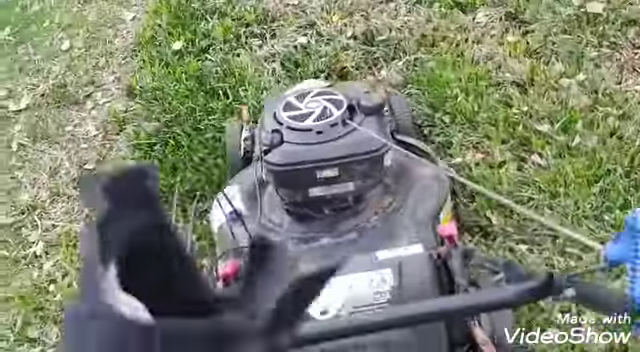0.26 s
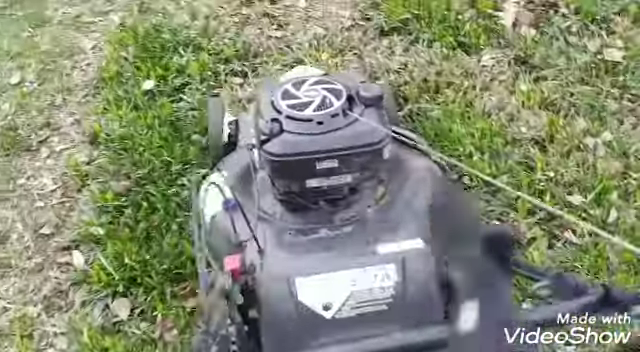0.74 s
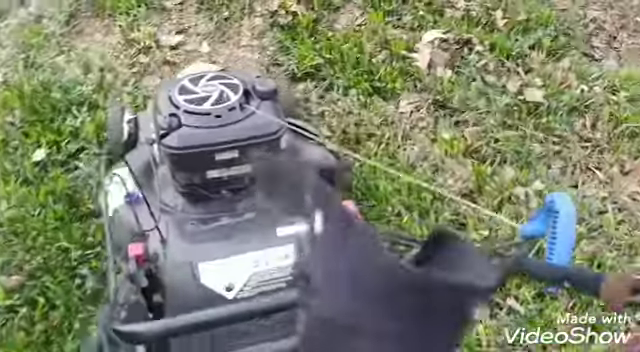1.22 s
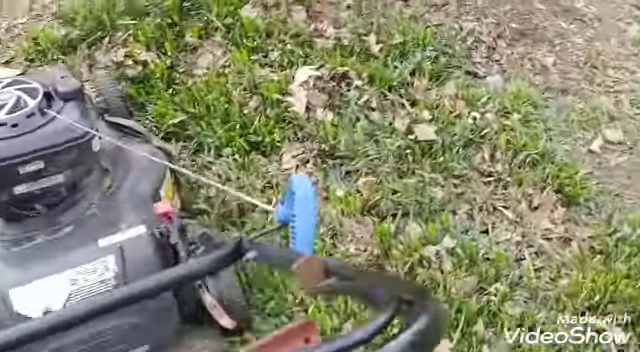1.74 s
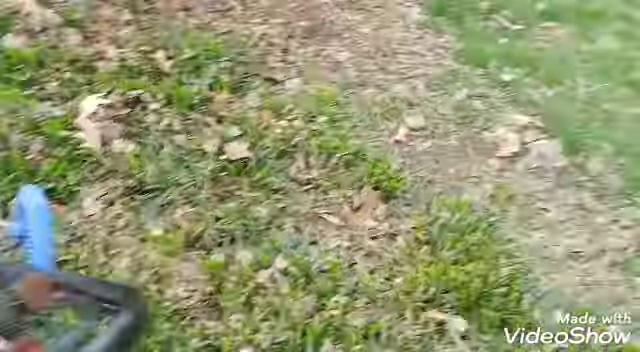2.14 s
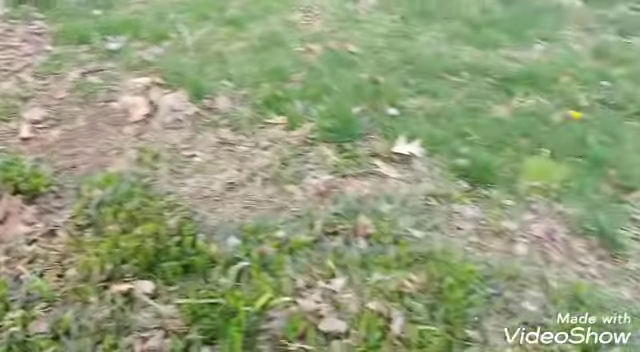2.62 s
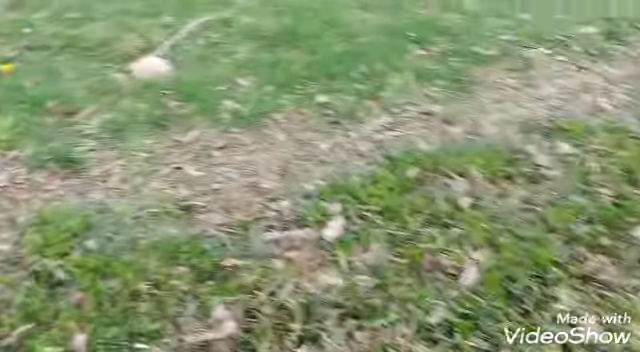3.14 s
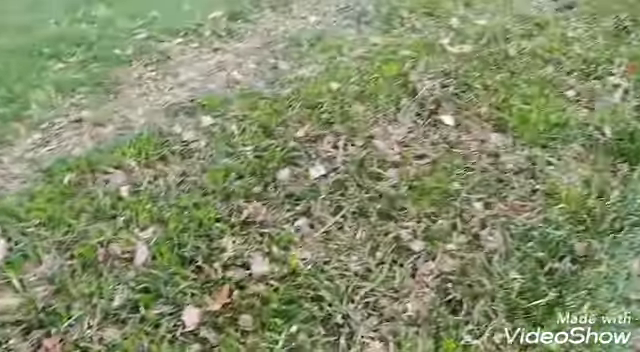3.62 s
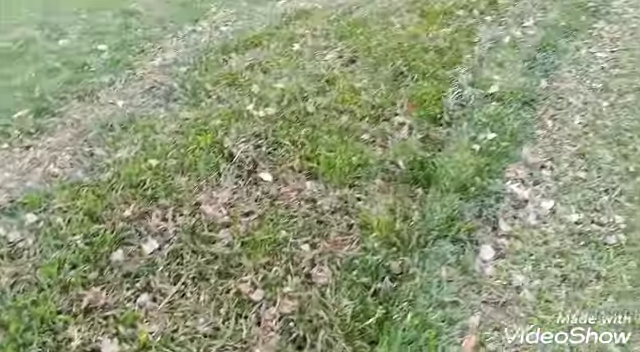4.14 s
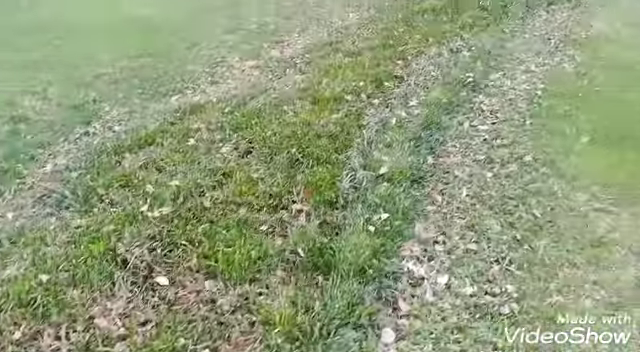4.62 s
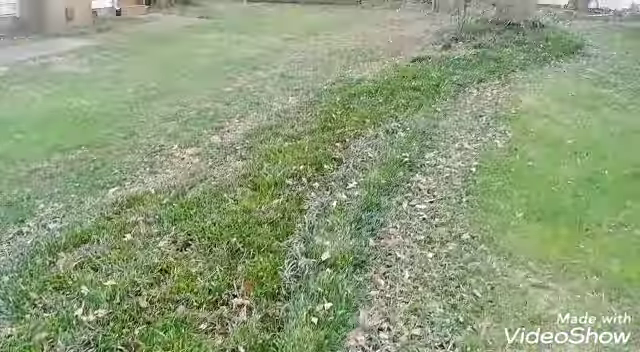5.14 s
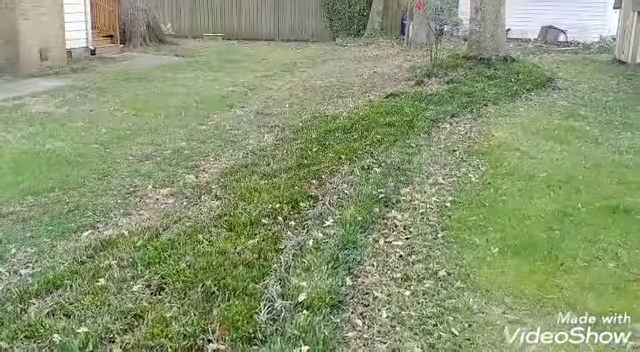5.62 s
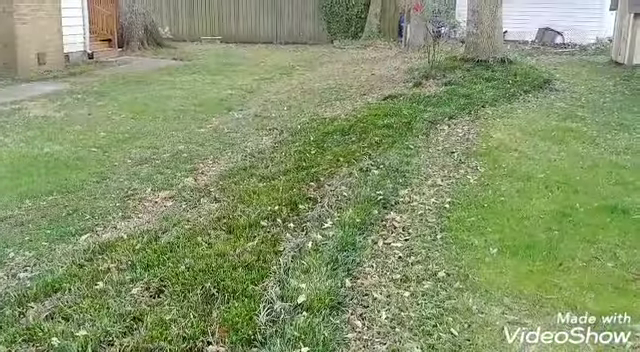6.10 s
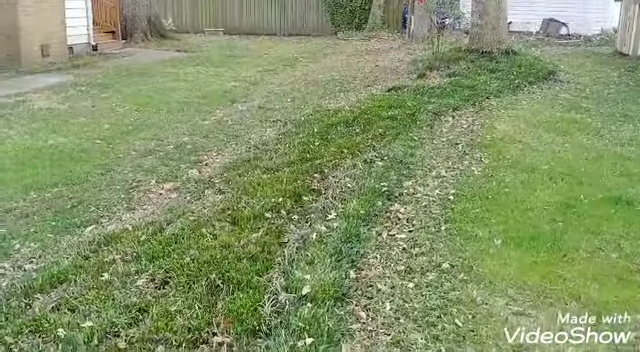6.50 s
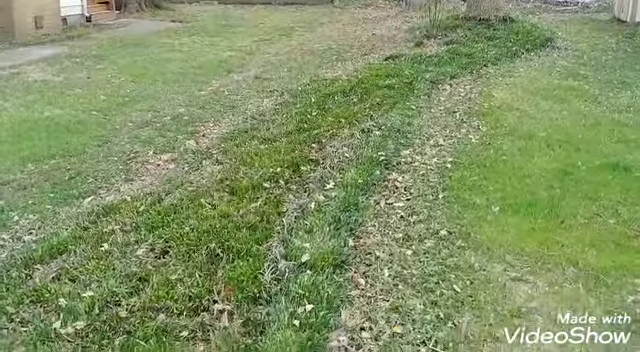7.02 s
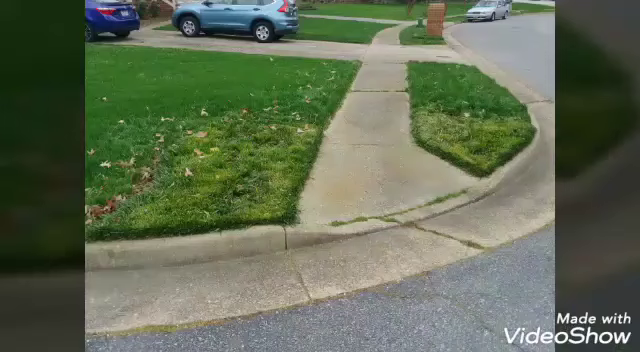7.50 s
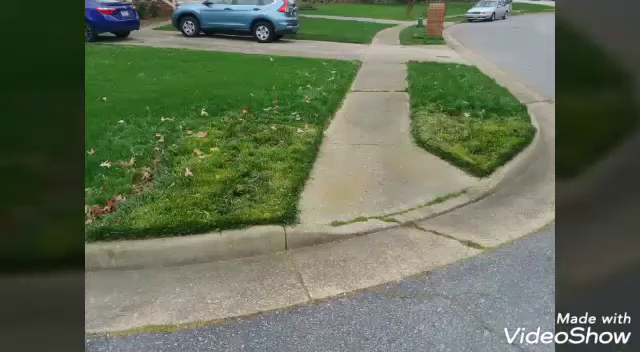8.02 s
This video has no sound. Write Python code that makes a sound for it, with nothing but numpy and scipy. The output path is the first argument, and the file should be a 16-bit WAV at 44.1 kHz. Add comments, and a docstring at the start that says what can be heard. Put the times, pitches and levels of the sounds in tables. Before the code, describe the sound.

A small lawn mower engine labours through grass with a rasping drone and hiss, its pitch creeping up as the load eases.

```python
"""A four-stroke push mower is already labouring in grass and dry leaves, its governed speed sagging.
Blade and exhaust drone, valve gear clatters, the muffler rasps once every two turns, cuttings hiss.
Over the first five seconds debris ticks in the deck, while a phone held behind the handle swings
from the engine to the lawn ahead. The load eases, the speed creeps up, and at 7.5 s the sound cuts off."""
import sys
import numpy as np
from scipy import signal
from scipy.fft import rfft, irfft
from scipy.io import wavfile
from scipy.ndimage import uniform_filter1d

SR = 44100
rng = np.random.default_rng(int(sys.argv[2]) if len(sys.argv) > 2 else 0)


def digitize_waveform(pressure):
    """Quantize a signal to 16-bit integers and store it at the path in sys.argv[1].

    Rows of a 2-D input are taken as channels; values are limited to [-1, 1].
    """
    field = np.atleast_2d(pressure).T
    bounded = np.clip(field, -1, 1)
    quanta = np.round(bounded * 32767).astype(np.int16)
    wavfile.write(sys.argv[1], SR, quanta)


N = 364266
TIME = np.arange(N) / SR


def undb(db):
    """Decibels to gain."""
    return 10 ** (np.asarray(db) / 20)


def curve(table):
    """Straight lines through (seconds, value) points."""
    return np.interp(TIME, *np.transpose(table))


def unit(x):
    """Scale to rms 1."""
    return x / np.sqrt(np.mean(x ** 2))


def noise(coherence):
    """Stereo white noise, partly common to both sides."""
    common, *own = rng.standard_normal((3, N))
    return np.sqrt(coherence) * common + np.sqrt(1 - coherence) * np.array(own)


def wander(rate_hz):
    """Smooth random drift, rms 1."""
    step = int(SR / rate_hz)
    stairs = np.repeat(rng.standard_normal(N // step + 1), step)
    return unit(uniform_filter1d(stairs, step)[:N])


def colour(x, spectrum):
    """Shape a sound by (Hz, relative dB) points."""
    hz, db = np.transpose(spectrum)
    bins_hz = np.maximum(np.fft.rfftfreq(N, 1 / SR), 1)
    gain = undb(np.interp(np.log(bins_hz), np.log(hz), db))
    return irfft(rfft(x) * unit(gain), N)


def ring(x, modes):
    """Parallel resonances of alternating sign."""
    return sum((-1) ** k * undb(db) * signal.lfilter(*signal.iirpeak(hz, hz / width_hz, SR), x)
               for k, (hz, width_hz, db) in enumerate(modes))


def puff(cycle, opens, rise):
    """A flow that starts once a cycle, swells to 1 and dies away."""
    age = (cycle - opens) % 1 / rise
    return age * np.exp(1 - age)


def turbulence(cycle, coherence, memory, points=1800):
    """Stereo eddies that partly repeat from one engine cycle to the next."""
    count = int(cycle[-1]) + 3
    common, *own = rng.standard_normal((3, count, points))
    eddies = np.sqrt(coherence) * common + np.sqrt(1 - coherence) * np.array(own)
    for k in range(1, count):
        eddies[:, k] = memory * eddies[:, k - 1] + np.sqrt(1 - memory ** 2) * eddies[:, k]
    position = (cycle + 1) * points
    return np.array([np.interp(position, np.arange(count * points), side.ravel()) for side in eddies])


# Spectrum of the cuttings. Each row: frequency in Hz, relative level in dB.
CUTTING_SPECTRUM = [(1200, -5), (2500, 1.5), (3200, 0), (3900, -0.5), (5300, -1), (5900, -5), (6400, -11),
                    (7200, -9.5), (8300, -7.5), (9300, -12), (10500, -16), (12000, -28)]


def grass(cycle, level_db, top_db, grain_db=1.5, chop=0.042, surge=0.2, top_hz=8500):
    """Countless stalks snap and spray against the deck, pulsing with the blade's turns."""
    pulse = 1 + chop * np.cos(2 * np.pi * 2 * cycle) + surge * puff(cycle, opens=0.95, rise=0.059)
    snaps = undb(grain_db * wander(1300))
    hiss = unit(colour(pulse * snaps * noise(0.33), CUTTING_SPECTRUM))
    top = signal.sosfilt(signal.butter(2, top_hz, "high", fs=SR, output="sos"), hiss)
    return (hiss + (undb(top_db) - 1) * top) * undb(level_db + 0.95 * wander(25))


# Blade strikes on debris. Each row: start in seconds, gain in dB, decay in seconds.
DEBRIS_STRIKES = [(0.237, -10.5, 0.006), (.2586, -8.5, .005), (1.277, -13.5, .0044), (1.405, -11, 0.0049),
                  (1.508, -10.5, 0.007), (1.5524, -13.5, 0.0062), (1.783, -10.5, .003), (2.2, -10.5, 0.004),
                  (2.339, -8, .002), (2.3607, -8.5, 0.0031), (3.0084, -15, 0.014), (3.445, 1, 0.00097),
                  (3.6586, -2, 0.0012), (4.175, -4.5, 0.0043), (4.835, -7.5, .002)]


def debris(attack_s=0.002):
    """Twigs and dry leaves shatter in short bright bursts."""
    bursts = np.zeros(N)
    age_s = np.arange(SR // 10) / SR
    attack = 1 - np.exp(-age_s / attack_s)
    for start_s, db, decay_s in DEBRIS_STRIKES:
        at = int(start_s * SR)
        bursts[at:at + len(age_s)] += undb(db) * attack * np.exp(-age_s / decay_s)
    bright = signal.lfilter([1, -.5], [1], noise(0.14))
    return bursts * unit(colour(bright, CUTTING_SPECTRUM))


# Low boom and broader rush of the deck air. Each row: frequency in Hz, relative level in dB.
BOOM_SPECTRUM = [(30, -66), (70, -30.5), (130, 0.5), (200, 3.5), (270, -3.5), (350, 8), (440, 5.5),
                 (540, -1), (800, -44)]
RUSH_SPECTRUM = [(40, -66.5), (250, 0), (450, -6.5), (570, 2), (680, -3), (800, -5.5), (1100, -3.5),
                 (1400, -12), (2000, -11.5), (3000, -24.5), (6000, -44.5)]


def deck_air(cycle, spectrum, level_db, memory, chop=0.18):
    """Air churned under the deck, chopped by each turn of the blade."""
    pulse = 1 + chop * np.cos(2 * np.pi * 2 * (cycle - .12))
    air = turbulence(cycle, coherence=0.91, memory=memory)
    return unit(colour(pulse * air, spectrum)) * undb(level_db)


# Valve and piston knocks. Each row: phase in the cycle from 0 to 1, relative level in dB.
CYCLE_KNOCKS = [(.05, 0), (.19, -2), (.43, -1), (.59, -1), (.72, 0), (.84, -1)]
# Modes of block and shroud. Each row: frequency in Hz, bandwidth in Hz, gain in dB.
BLOCK_MODES = [(690, 28, -10), (932.3, 4.5, 9.5), (1019, 9.8, 5.5), (1098.6, 21, 3.5), (1134, 68, 1),
               (1183, 50, -9), (1334, 33, -13), (1580, 160, -7), (1865, 20, -13.5), (1956, 17, -7.5)]


def clatter(cycle, level_db, scatter_db=3.0, jitter_cycles=.0006, rattle_db=-14):
    """The same knocks return every cycle, loose in time and force, and set the block whining."""
    blows = np.zeros(N)
    numbers = np.arange(int(cycle[-1]) - 1)
    for phase, db in CYCLE_KNOCKS:
        late, force = rng.standard_normal((len(numbers), 2)).T
        at = np.searchsorted(cycle, numbers + phase + jitter_cycles * late)
        blows[at] += undb(db + scatter_db * force)
    rattle = undb(rattle_db) * noise(.7)
    return unit(ring(unit(blows) + rattle, BLOCK_MODES)) * undb(level_db)


def equal_charges(bursts, cycle, spread_db=0.41):
    """Every firing expels the same charge, so each cycle gets nearly the same power."""
    number = np.floor(cycle - np.floor(cycle[0])).astype(int)
    power = np.bincount(number, np.mean(bursts ** 2, axis=0)) / np.bincount(number)
    strength = undb(spread_db * rng.standard_normal(N // 100))
    return bursts / np.sqrt(power[number]) * strength[number]


# Modes of the muffler can. Each row: frequency in Hz, bandwidth in Hz, gain in dB.
CAN_MODES = [(1657, 180, -6.5), (1905, 100, -2.5), (2199, 53.4, 1.5), (2613, 74, -12)]
# Spectrum of the gas jet. Each row: frequency in Hz, relative level in dB.
JET_SPECTRUM = [(900, -35), (1450, -18.5), (1800, 7.5), (2300, 10.5), (2900, -1), (3600, -7), (4500, -10),
                (5500, -35), (9000, -42)]


def muffler(cycle, level_db, jet_db, leak=.19, peak_phase=0.13, width_cycles=0.1, kick_db=-7):
    """The exhaust valve opens and shuts: two kicks and a swell of gas ring the can; its holes hiss."""
    from_peak = (cycle - peak_phase + .5) % 1 - .5
    flow = leak + np.exp(-(from_peak / width_cycles) ** 2) + 0.13 * puff(cycle, opens=0.19, rise=0.14)
    gas = turbulence(cycle, coherence=.97, memory=.82)
    kicks = sum(np.diff(np.floor(cycle - phase), prepend=-1) for phase in (.105, .16))
    can = ring(unit(flow * gas) + undb(kick_db) * unit(kicks), CAN_MODES)
    can = equal_charges(can, cycle)
    jet = unit(colour((flow + .25) * noise(0.81), JET_SPECTRUM))
    jet_gain = undb(jet_db)
    return (can + jet_gain * jet) / np.sqrt(1 + jet_gain ** 2) * undb(level_db)


# Exhaust lines between the blade tones. Each row: multiple of the firing rate, relative level in dB.
THROB_HARMONICS = [(2, -3.5), (3, -9), (4, 1.5), (5, 2.5), (6, 5.5), (7, -6), (9, -8), (10, -13), (11, -10),
                   (13, -16), (14, -13), (15, -18), (17, -30.5), (18, -22.5), (20, -10.5)]


def exhaust_throb(cycle, level_db, odd_shift=0.33, waver_db=0.97):
    """Even harmonics keep step with the crank; odd ones come from the firing alone, shifted in phase."""
    throb = sum(undb(db) * np.cos(2 * np.pi * (k * cycle + odd_shift * (k % 2)))
                for k, db in THROB_HARMONICS)
    return unit(throb) * undb(level_db + waver_db * wander(24))


# Blade harmonics 2 (the main hum) and 3. Each row: time in seconds, level in dB.
BLADE_SECOND_DB = [(0.06, -11), (0.22, -14), (1.23, -12.5), (1.41, -17), (1.48, -13), (1.78, -11),
                   (2.16, -16.5), (2.46, -14), (3.2, -20.5), (3.27, -22), (4.05, -16.5), (7.44, -15)]
BLADE_THIRD_DB = [(0.06, -31), (0.49, -19), (0.65, -42), (0.72, -23.5), (0.88, -32), (1.13, -17.5),
                  (1.46, -32.5), (1.48, -23), (2.34, -26.5), (2.46, -19), (3.86, -34.5), (4.42, -24),
                  (7.27, -25.5), (7.44, -27)]


def blade_drone(cycle, fourth_db, waver_db=.6):
    """The blade tips pass four times a cycle and sound harmonics 2 to 4 of that rate."""
    levels_db = [curve(BLADE_SECOND_DB), curve(BLADE_THIRD_DB), fourth_db]
    return np.sqrt(2) * sum(undb(db + waver_db * wander(14)) * np.cos(2 * np.pi * 4 * k * cycle)
                            for k, db in enumerate(levels_db, 2))


def ports(x, lead_ms, left_over_right_db):
    """A source off to one side reaches the phone's left port first, and the two at different levels."""
    oversampled = signal.resample_poly(x[0], 4, 1)
    left = np.interp(TIME + lead_ms / 1000, np.arange(4 * N) / (4 * SR), oversampled)
    gains = undb(np.vstack([left_over_right_db, -left_over_right_db]) / 2)
    gains /= np.sqrt(np.mean(gains ** 2, axis=0))
    return np.array([left, x[1]]) * gains


def facing(bearing_deg, front_db, back_db, lobe_deg, width_deg, lobe_db, front_deg=53, back_deg=164):
    """Level in dB at a bearing: a slope from front to back with one lobe or shadow."""
    slope_db = np.interp(bearing_deg, [front_deg, back_deg], [front_db, back_db])
    return slope_db + lobe_db * np.exp(-((bearing_deg - lobe_deg) / width_deg) ** 2)


# Engine load. Each row: time in seconds, drop below free speed in rpm.
DROOP_RPM = [(0.0, 251.3), (0.2, 244.6), (0.4, 198.5), (0.95, 133.1), (1.38, 155.1), (1.55, 205.3),
             (1.8, 151.2), (2.1, 114.6), (2.55, 120.6), (3.4, 101.0), (3.82, 71.9), (4.25, 111.9),
             (4.7, 75.8), (5.75, 45.8), (6.75, 29.9), (7.48, 31.9)]
# Swing of the phone. Each row: time in seconds, bearing of the mower in degrees.
BEARING_DEG = [(0, 47), (.9, 60.7), (1.6, 78.5), (2.3, 83), (2.7, 104.6), (3.2, 125.6), (3.8, 141.8),
               (4.6, 159), (7.45, 164)]
# How each named part carries to the phone. Each row: front level in dB, back level in dB,
# lobe bearing in degrees, lobe width in degrees, lobe gain in dB (negative for a shadow).
PART_DIRECTIVITY = {"throb": (-20.5, -21.5, 139.5, 20, -2.5), "fourth blade tone": (-36, -23, 118.5, 27, 9),
                    "boom": (-28, -22.5, 119, 27, 7.5), "rush": (-19.5, -22.5, 101.5, 21.5, -3.5),
                    "clatter": (-28, -24.5, 98.5, 14.5, -0.5), "rasp": (-25, -25, 114.5, 45, 6.5),
                    "hiss": (-30, -31.5, 136, 33.5, 4.5)}
# Balances, same columns: jet over can, treble gain of the hiss, left over right for two sources.
JET_OVER_CAN = (-12.5, -8.5, 128, 26, 12.5)
HISS_TREBLE = (2.5, 0, 95, 29.5, 5)
ENGINE_BALANCE = (-4.5, -6.5, 89, 40.5, -3)
CUTTING_BALANCE = (1.5, -5, 102.5, 39, 3.5)


def scene(free_rpm=3000, hiss_db_per_rpm=0.0141, side_lead_ms=0.4565):
    """One crankshaft times the mower; load sets its speed, the phone's swing sets levels and stereo."""
    droop_rpm = curve(DROOP_RPM)
    firing_hz = (free_rpm - droop_rpm) / 60 / 2
    cycle = -.023 + np.cumsum(firing_hz) / SR  # one cycle is two turns
    bearing_deg = curve(BEARING_DEG)
    level_db = {part: facing(bearing_deg, *row) for part, row in PART_DIRECTIVITY.items()}
    drone = exhaust_throb(cycle, level_db["throb"]) + blade_drone(cycle, level_db["fourth blade tone"])
    boom = deck_air(cycle, BOOM_SPECTRUM, level_db["boom"], memory=0.65)
    rush = deck_air(cycle, RUSH_SPECTRUM, level_db["rush"], memory=0.46)
    knocks = clatter(cycle, level_db["clatter"])
    rasp = muffler(cycle, level_db["rasp"], facing(bearing_deg, *JET_OVER_CAN))
    # Thick grass slows the engine and hisses louder.
    hiss_db = level_db["hiss"] + hiss_db_per_rpm * droop_rpm
    cuttings = grass(cycle, hiss_db, facing(bearing_deg, *HISS_TREBLE)) + debris()
    lead_ms = side_lead_ms * np.sin(np.radians(bearing_deg))
    return (ports(drone + boom, 0.77 * lead_ms, left_over_right_db=1.5)
            + ports(rush, 0.51 * lead_ms, left_over_right_db=1.7)
            + ports(knocks + rasp, lead_ms, facing(bearing_deg, *ENGINE_BALANCE))
            + ports(cuttings, lead_ms, facing(bearing_deg, *CUTTING_BALANCE)))


def record(dry, left_bass_hz=72, bottom_hz=25, top_hz=11900, stop_s=7.484, fade_s=.004):
    """The left port passes less bass; the sound is cut short; the phone clips peaks and drops the top."""
    left = signal.lfilter(*signal.butter(1, left_bass_hz, "high", fs=SR), dry[0])
    sound = signal.sosfilt(signal.butter(2, bottom_hz, "high", fs=SR, output="sos"), [left, dry[1]])
    gate = np.clip((stop_s - TIME) / fade_s, 0, 1)
    sound = np.clip(sound * gate, -.95, .95)
    return signal.sosfilt(signal.ellip(10, .2, 80, top_hz, fs=SR, output="sos"), sound)


dry = scene()
out = record(dry)
digitize_waveform(out)
```